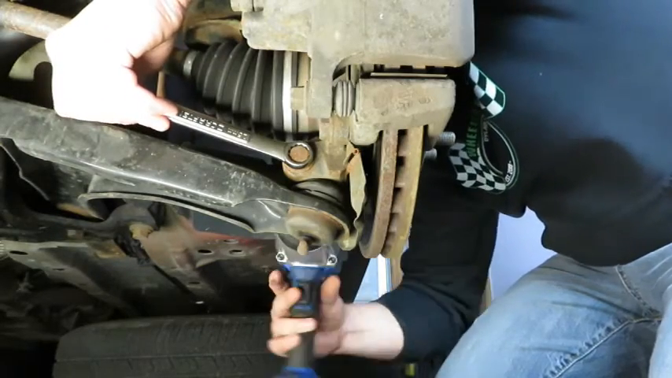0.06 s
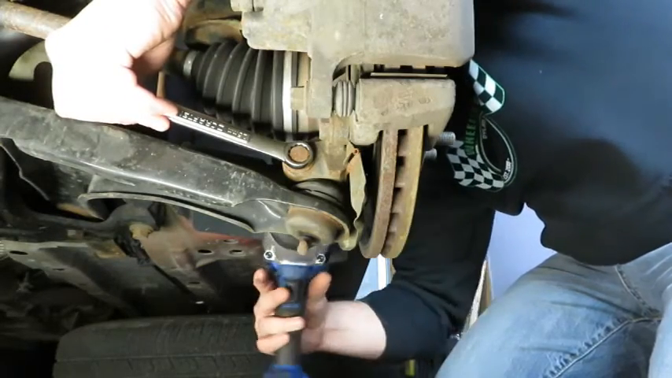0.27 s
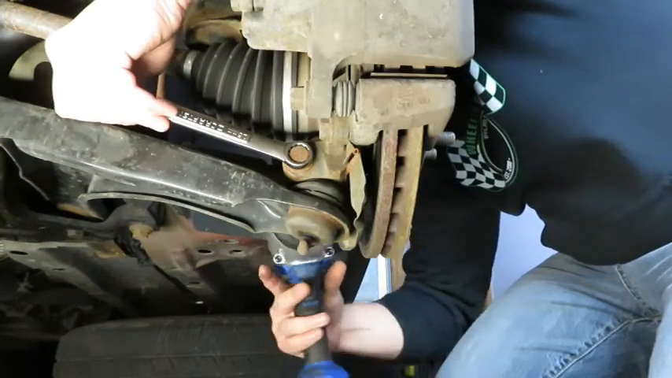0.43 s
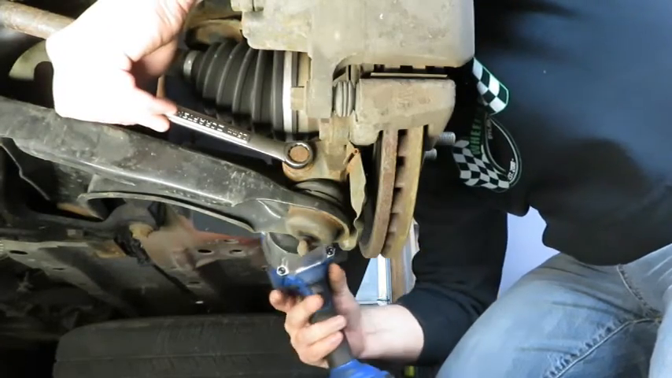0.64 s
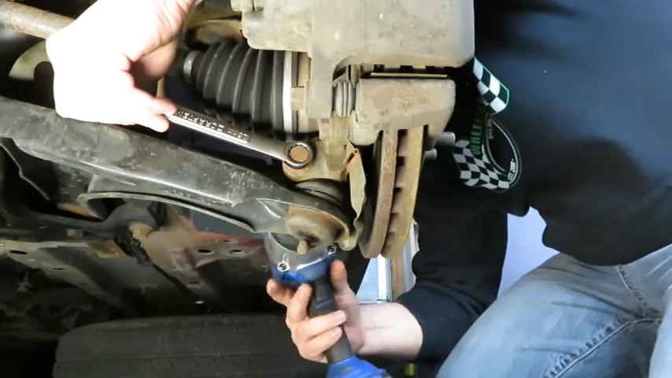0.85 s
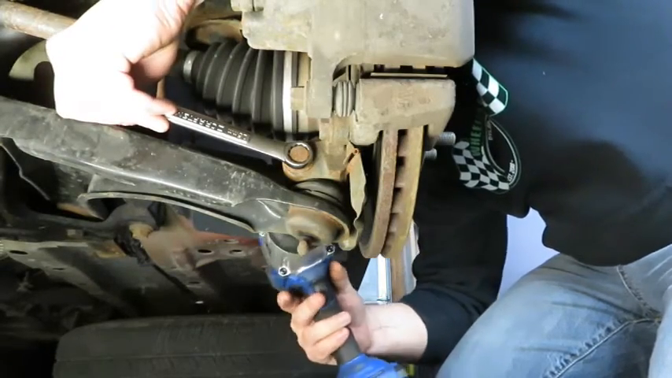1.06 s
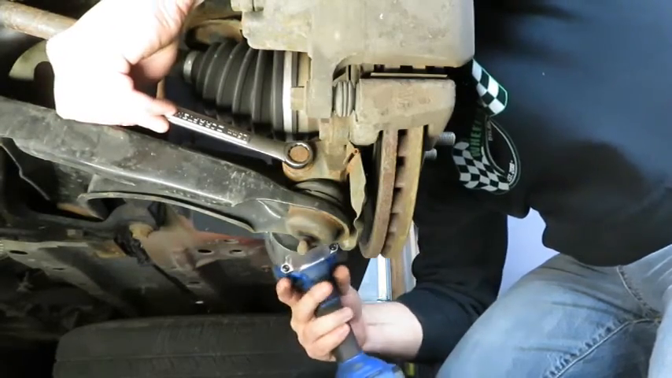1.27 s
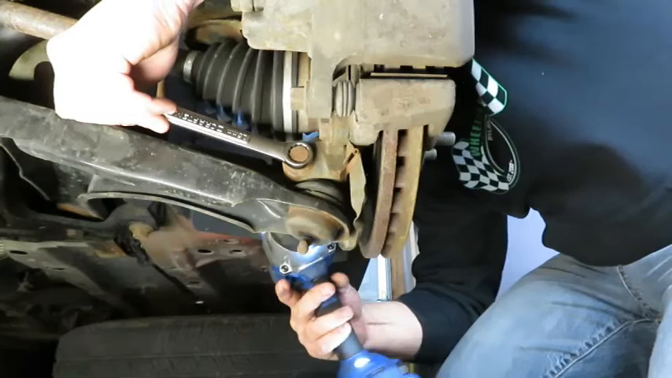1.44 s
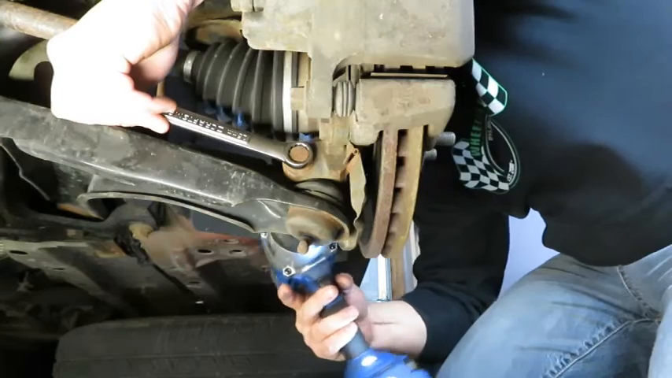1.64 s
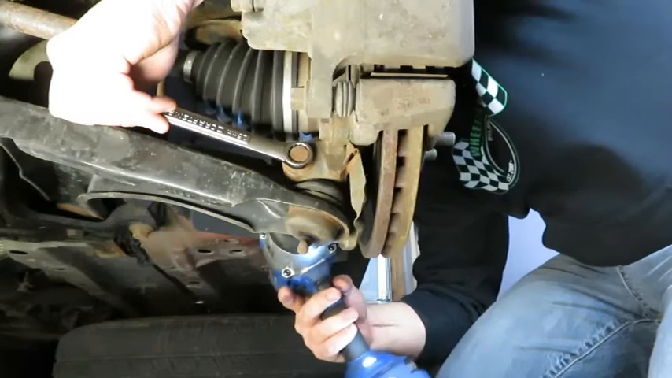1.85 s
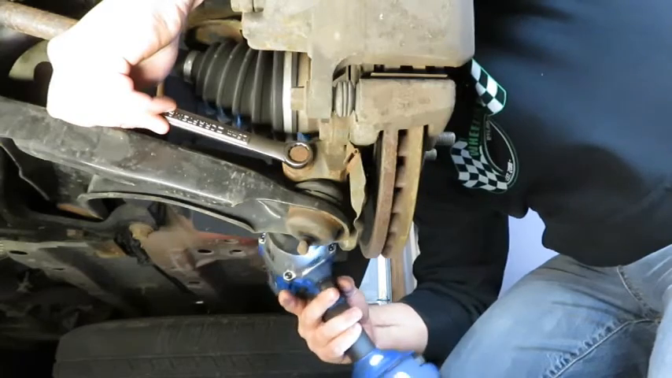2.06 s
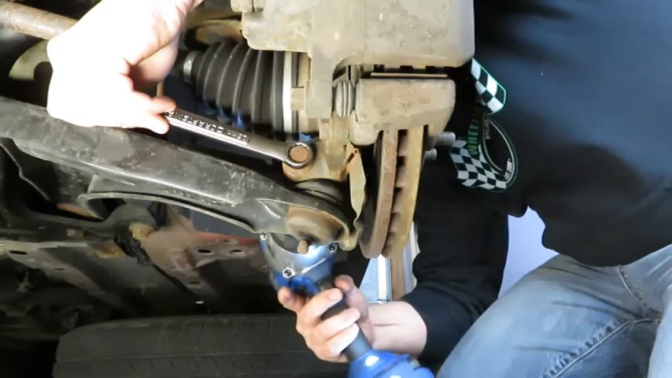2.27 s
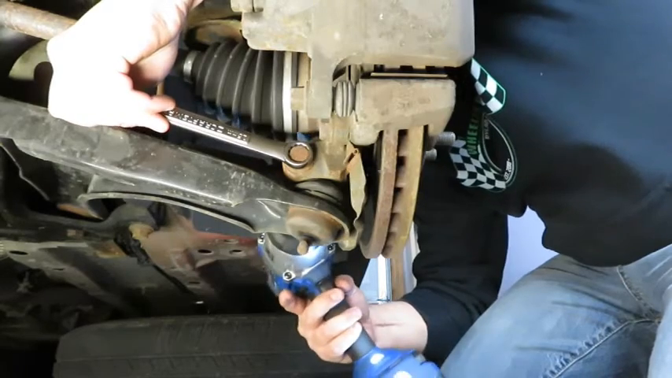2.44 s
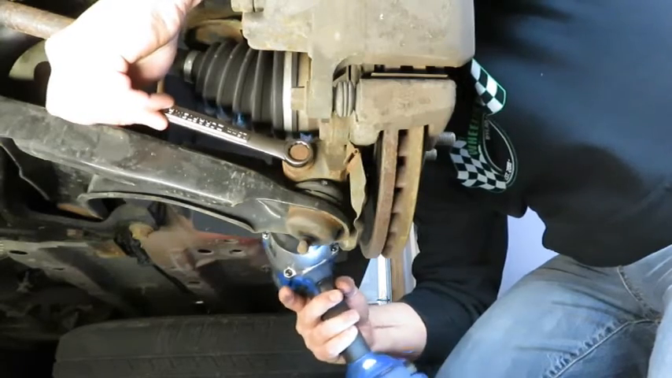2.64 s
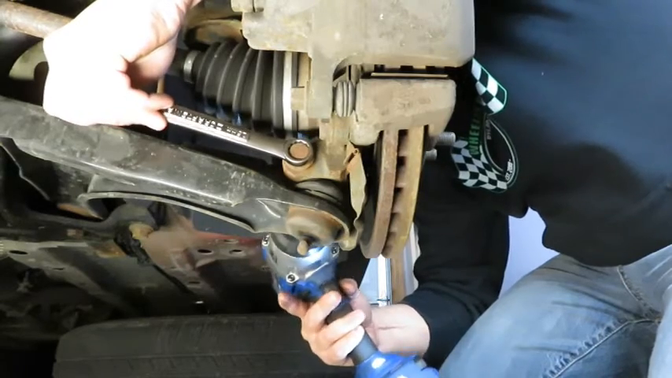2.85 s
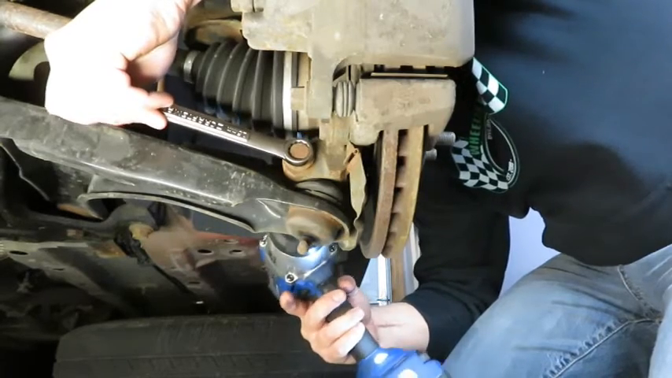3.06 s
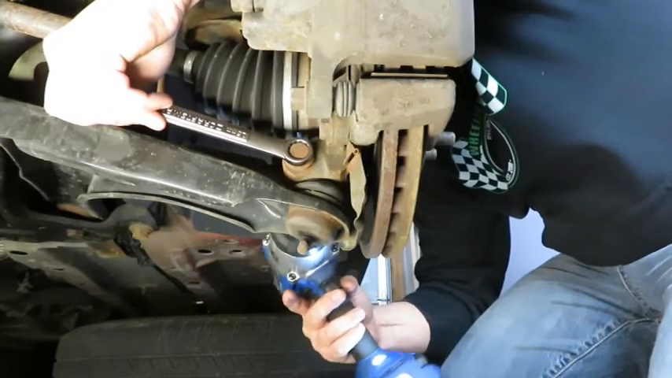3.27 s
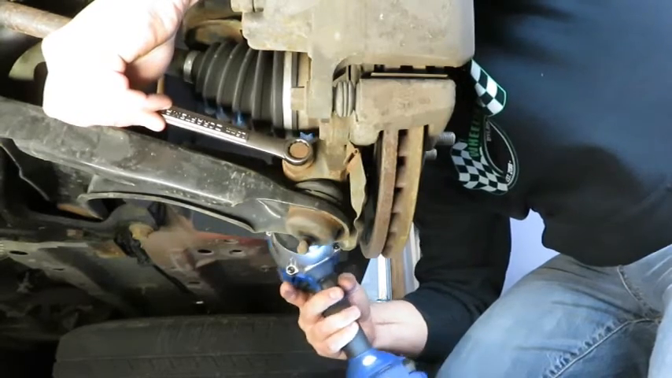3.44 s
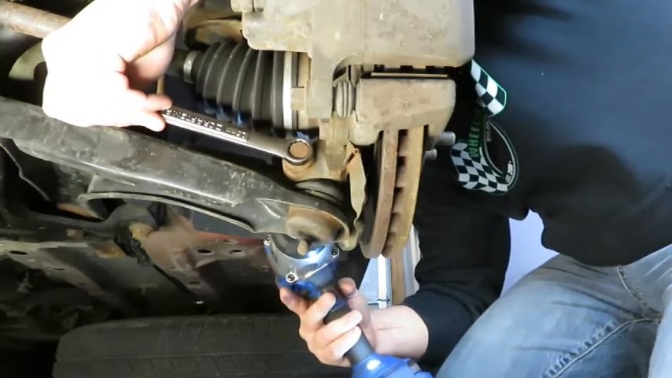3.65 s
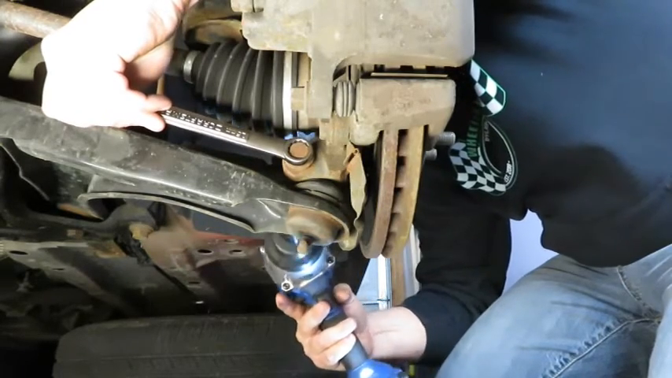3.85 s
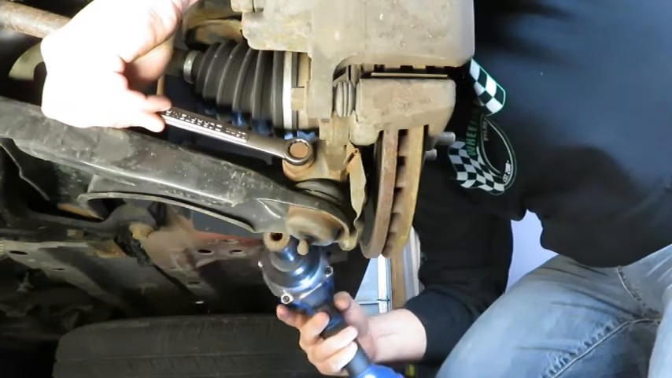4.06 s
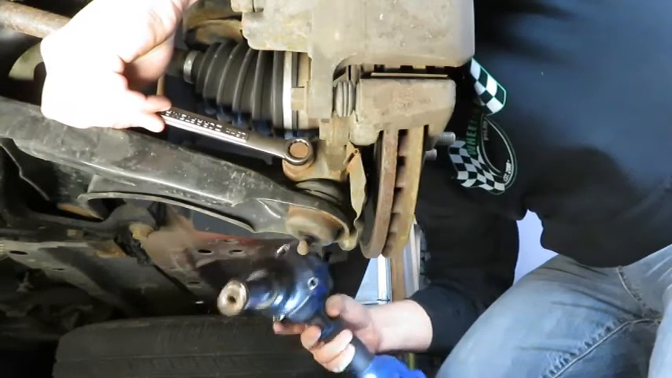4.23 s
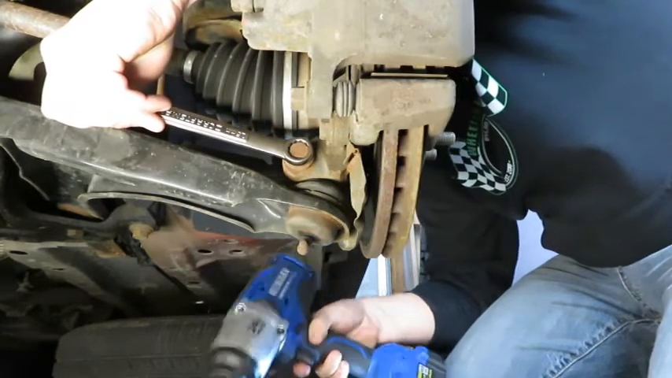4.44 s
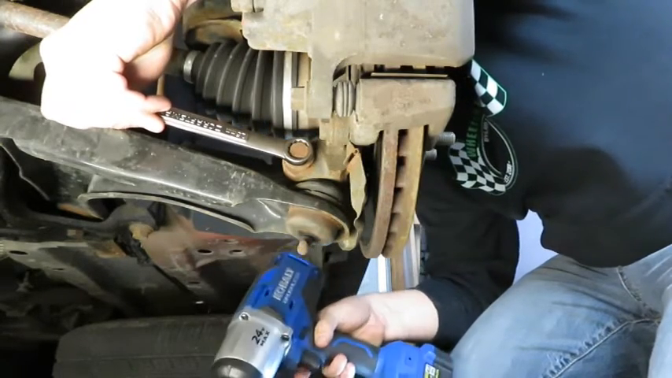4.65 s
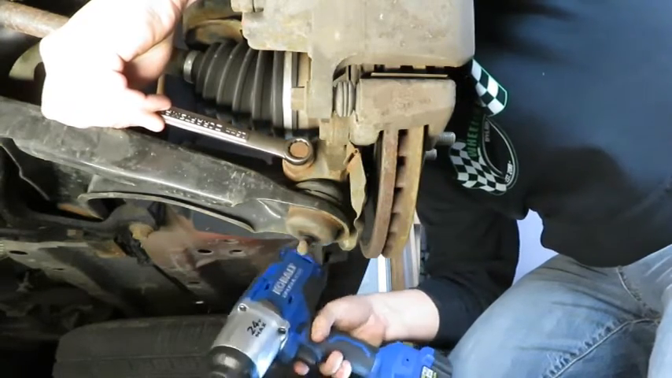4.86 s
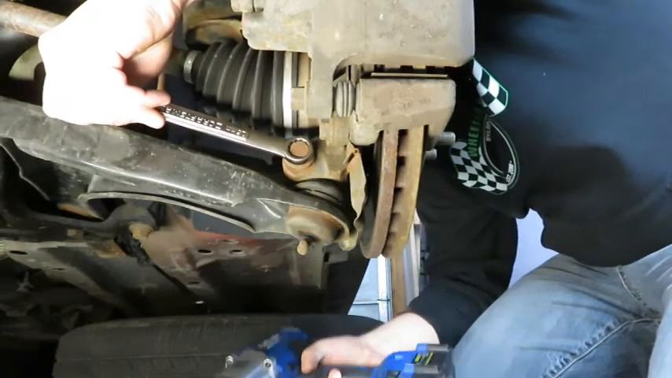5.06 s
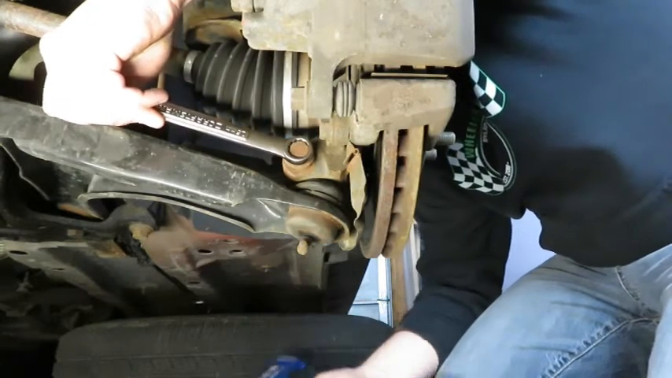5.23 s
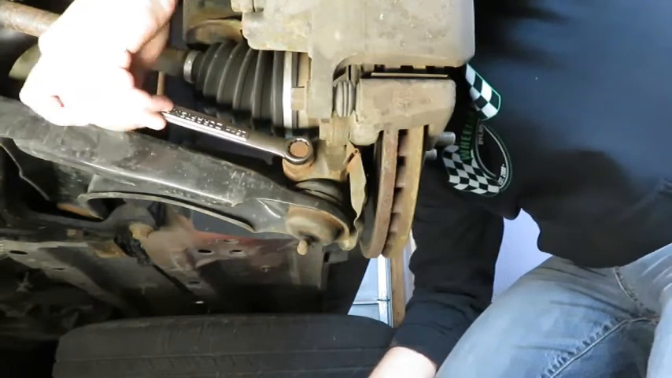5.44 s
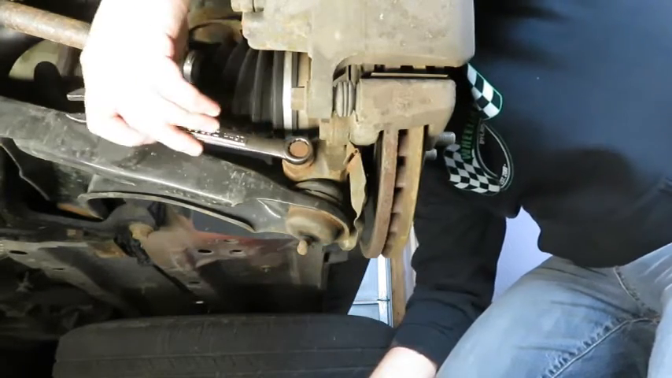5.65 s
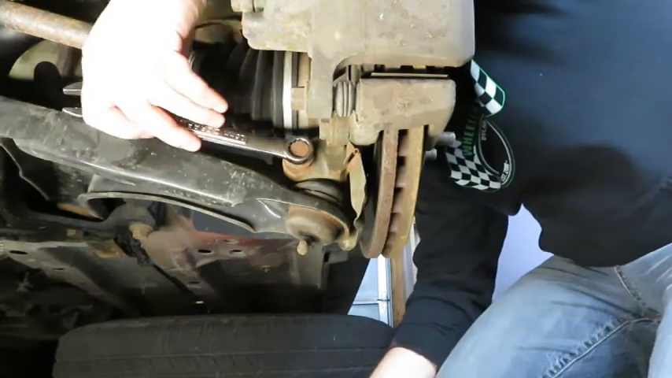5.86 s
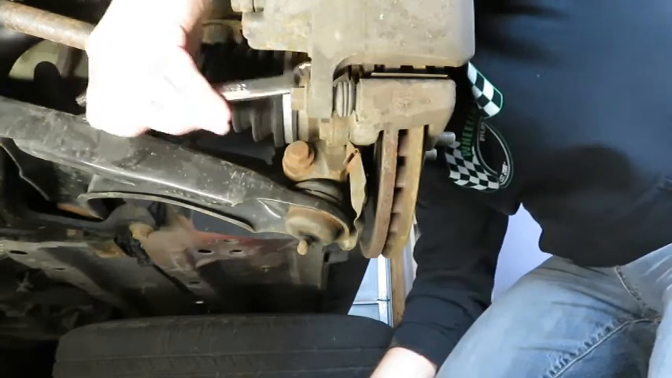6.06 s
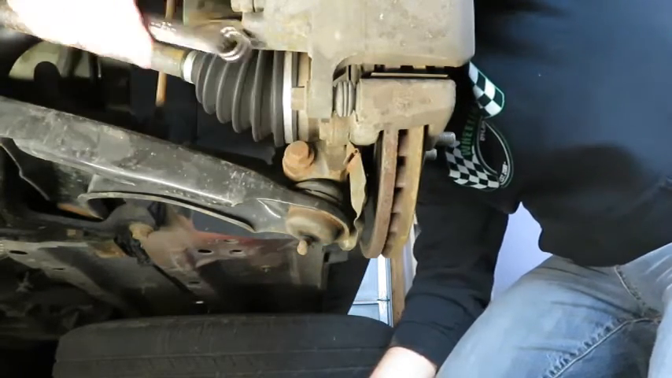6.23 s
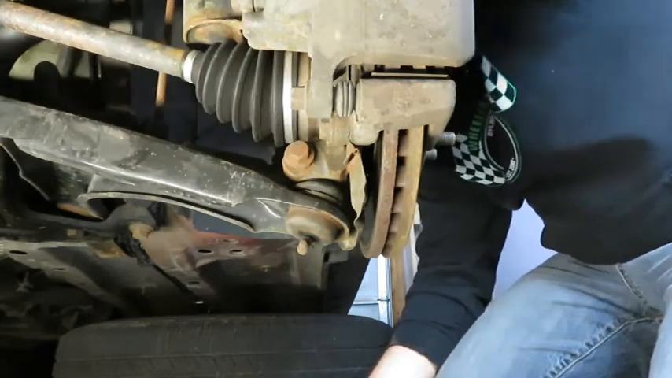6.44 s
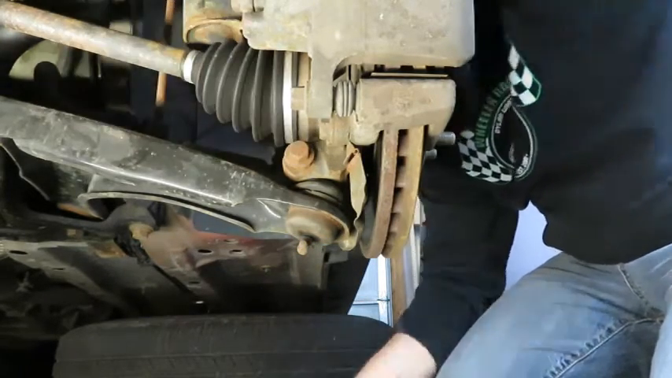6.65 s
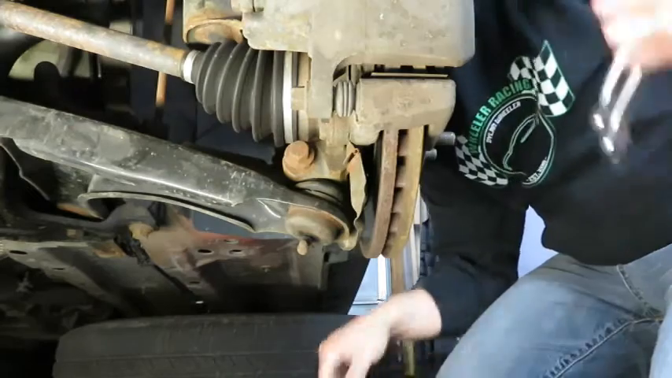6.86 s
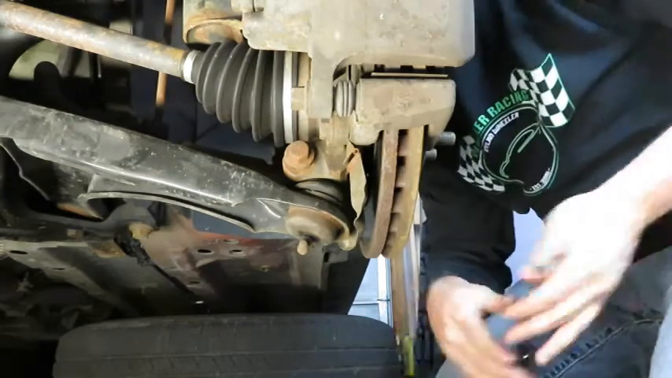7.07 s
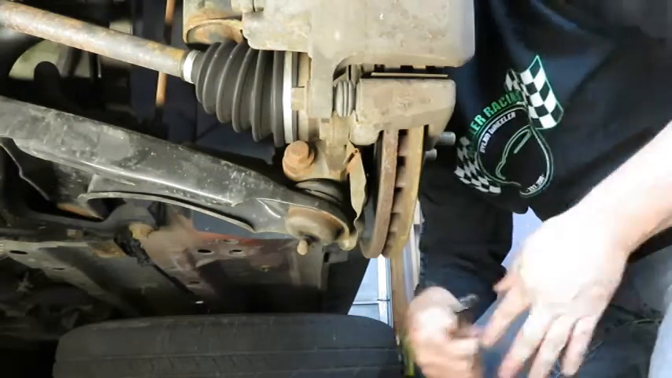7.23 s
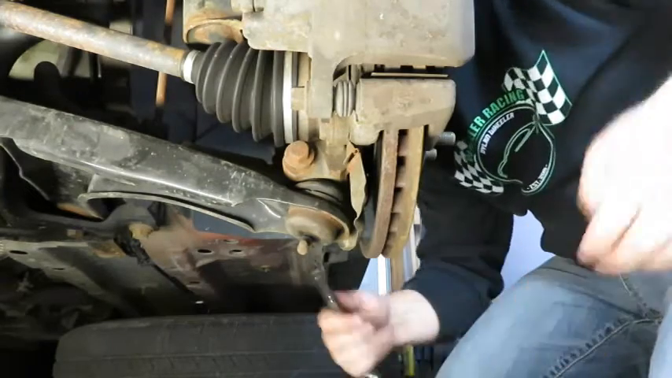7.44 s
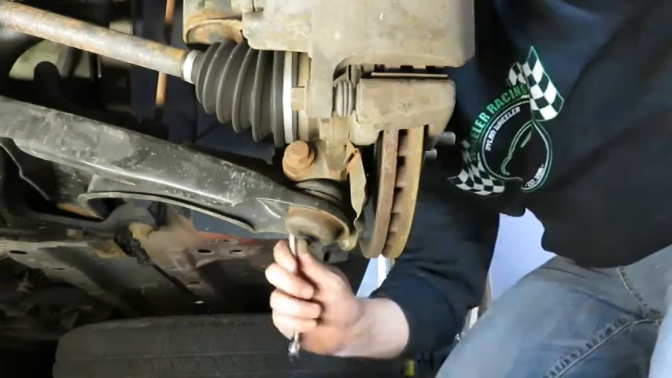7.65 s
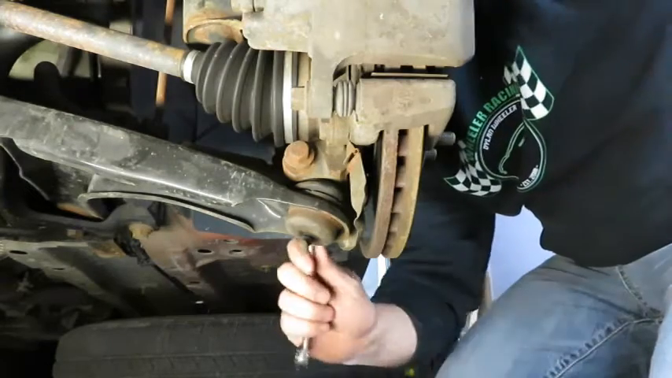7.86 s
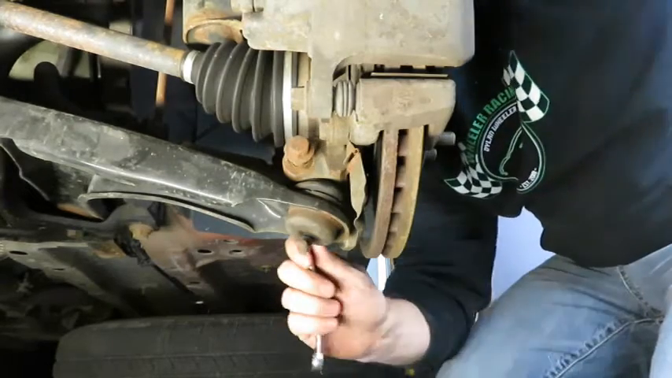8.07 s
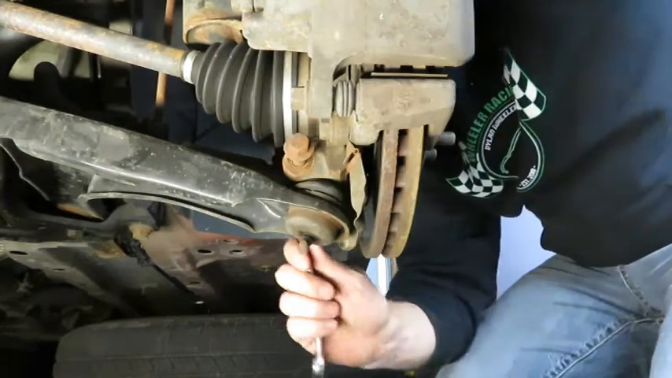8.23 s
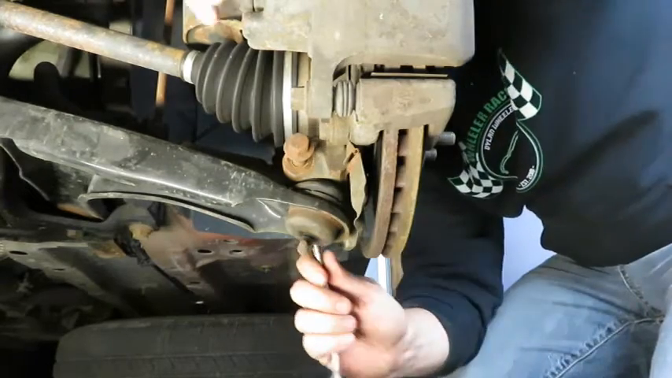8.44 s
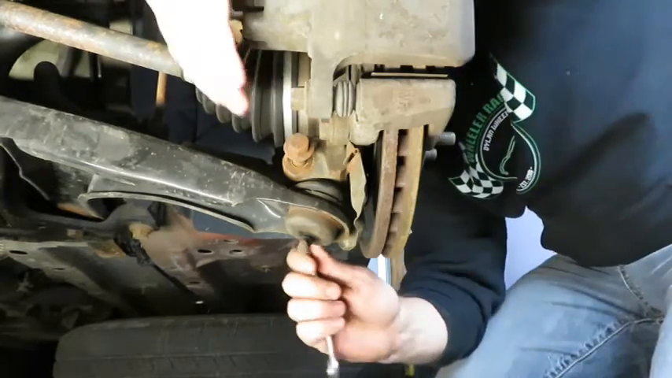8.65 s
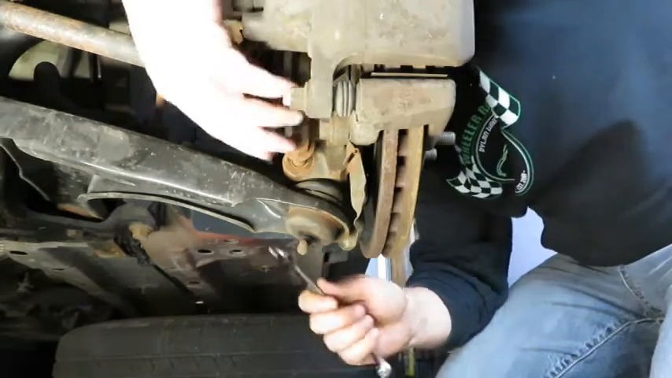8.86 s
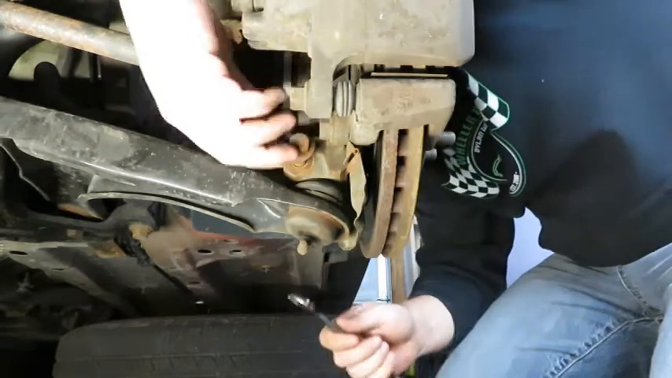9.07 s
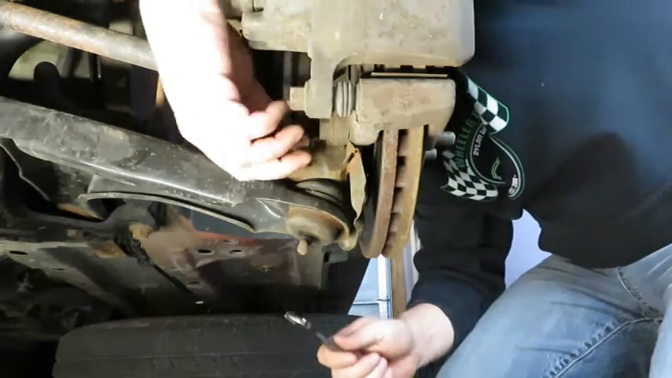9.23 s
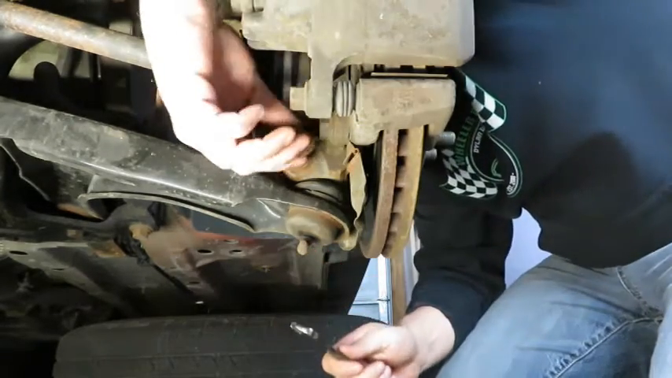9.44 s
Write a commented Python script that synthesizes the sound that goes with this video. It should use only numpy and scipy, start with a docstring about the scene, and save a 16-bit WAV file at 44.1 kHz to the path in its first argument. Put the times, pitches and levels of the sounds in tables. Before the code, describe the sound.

A close, nearly centred microphone in a garage with low rumble and a short reverberation. At 0.1 s a socket scrapes and thuds onto a nut, the suspension arm ringing dully; softer knocks follow by 0.6 s and a small clack at 1.3. At 1.43 an impact wrench surges into violent metallic hammering, about thirty blows per second, overloading at first. Further bursts start near 1.85, 2.3, 2.8 and 3.15 s, generally weaker, with gear rattle between. At 3.44 the nut is free: the motor spins up quickly, then its whine glides down, stopping around 4.8. Light handling knocks lead to a solid set-down at 5.5. A spanner comes off with a bright ringing clink at 6.05 and a smaller one at 6.2. Faint cloth brushes past near 6.7. Steel clacks at 7.95, loudly at 8.1, then 8.3 and sharply at 8.45. Quiet rumble follows, with small clacks near 9.4.

```python
"""Impact wrench in a garage

A cordless impact wrench hammers a suspension nut in short bursts, close by, then spins free and coasts down.
Random contact noise and decaying sine tones make the metal; gear tones and tooth noise make the motor.
Tools are handled and set down, a spanner comes off with a clink, and steel hardware clacks against the hub.
A low room rumble lies under it all; the hardest blows overload the microphone."""
import sys
import numpy as np
from scipy import signal
from scipy.fft import rfft, irfft
from scipy.io import wavfile
from scipy.ndimage import uniform_filter1d

SR = 44100
rng = np.random.default_rng(int(sys.argv[2]) if len(sys.argv) > 2 else 0)


def generate_wav(signal):
    """Clip the signal to [-1, 1] and save it as 16-bit WAV at the path in sys.argv[1]."""
    frames = np.transpose(np.atleast_2d(signal))
    scaled = np.clip(frames, -1, 1) * 32767
    pcm = np.round(scaled).astype(np.int16)
    wavfile.write(sys.argv[1], SR, pcm)


N = 418950
TIME = np.arange(N) / SR


def amp(db):
    """Turns decibels into a gain."""
    return 10 ** (np.asarray(db) / 20)


def unit(x):
    """Scales a signal to an average strength (rms) of 1."""
    return x / np.sqrt(np.mean(x ** 2) + 1e-20)


def read(points, hz):
    """Reads a table by frequency, on a logarithmic axis as the ear hears pitch."""
    f, value = np.transpose(points)
    return np.interp(np.log(hz + 1), np.log(f + 1), value)


def bump(hz, centre_hz, octaves):
    """Draws a bell curve around one frequency, on a logarithmic axis."""
    distance = np.log2((hz + 1) / (centre_hz + 1))
    return np.exp(-(distance / octaves) ** 2)


def swell(rows):
    """Makes a gain over time from rows that start with s and end with dB; silent outside them."""
    rows = np.array(rows)
    s, db = rows[:, 0], rows[:, -1]
    inside = np.interp(TIME, s, np.ones(len(rows)), 0, 0)
    return inside * amp(np.interp(TIME, s, db))


def add(mix, s, sound):
    """Lays a sound into the mix at time s."""
    part = mix[:, round(s * SR):][:, :sound.shape[1]]
    part += sound[:, :part.shape[1]]


def colour(x, spectrum, tilt=0):
    """Gives x a spectrum, tilted in dB per octave above 200 Hz, at rms 1."""
    hz = np.fft.rfftfreq(x.shape[1], 1 / SR)
    db = read(spectrum, hz) + tilt * np.log2(np.maximum(hz, 200))
    return unit(irfft(rfft(x) * amp(db), x.shape[1]))


def noise(spectrum, tilt=0, size=N):
    """Makes two unrelated coloured noises: mid (centre) and side (left minus right)."""
    return colour(rng.standard_normal((2, size)), spectrum, tilt)


def drift(per_s):
    """Wanders at random with rms 1, through per_s new values each second."""
    knots = rng.standard_normal(2000)
    return unit(np.interp(TIME * per_s, np.arange(len(knots)), knots))


def widen(pair, width):
    """Sets how strong the side is at each frequency."""
    gain = amp(read(width, np.fft.rfftfreq(N, 1 / SR)))
    return np.array([pair[0], irfft(rfft(pair[1]) * gain, N)])


def strike(crack, tilt, t60, hold, modes=(), favoured_hz=0, muted_hz=0, ring_db=0, favour_db=7,
           mute_octaves=.1, spread=0.19):
    """Rough contact makes a crack coloured by the body's own tones (modes), which ring on and beat."""
    t, hz = np.arange(SR // 2) / SR, np.fft.rfftfreq(SR // 2, 1 / SR)
    # full strength for hold seconds, then 60 dB weaker after each t60
    chatter = noise(crack, tilt, size=len(t)) * amp(-60 * np.maximum(t - hold, 0) / t60)
    width_hz, resonance = 60, 0.66  # how broadly and how strongly the modes colour the crack
    beat_depth, mute_db = .45, 15
    body, ring = np.ones(len(hz), complex), 0 * t
    for mode_hz, db, ring_t60 in modes:
        # a mode struck near its still point stays quiet
        db = db - mute_db * bump(mode_hz, muted_hz, mute_octaves)
        body += resonance * amp(db / 2) / (1 + 2j * (hz - mode_hz) / width_hz)
        phase, luck = rng.random((2, 2, 1))
        height = (0.83 + luck / 2) * amp(ring_db + db + tilt * np.log2(mode_hz / 3000))
        # close pairs of modes beat
        beat = 1 + beat_depth * np.cos(2 * np.pi * rng.uniform(5.7, 33) * t)
        tone = np.sin(2 * np.pi * (mode_hz * t + phase))
        ring = ring + height * beat * amp(-60 * t / ring_t60) * tone
    # an extra early ring dies fast, damped while the parts still touch
    prompt_db, prompt_s = 1, 0.0065
    ring = ring * (1 + amp(prompt_db) * np.exp(-t / prompt_s))
    # the place of contact brings out one region of tones
    favour = amp(favour_db * bump(hz, favoured_hz, spread))
    sound = irfft((rfft(chatter) * body + rfft(ring)) * favour, len(t))
    soft_start = np.sin(np.pi / 2 * np.minimum(t / 0.0014, 1)) ** 2
    damped_end = np.minimum(2 - 2 * t / t[-1], 1) ** 2
    sound *= soft_start * damped_end
    return sound * np.linalg.norm(chatter) / np.linalg.norm(sound)


def hits(rows, crack, hold, modes=(), **contact):
    """Plays a table of blows on one body."""
    out = np.zeros((2, N))
    for s, db, tilt, t60, *place in rows:
        add(out, s, amp(db) * strike(crack, tilt, t60, hold, modes, *place, **contact))
    return out


# two stretches when the background sinks and swells back:
# (time [s], depth [dB], time from start to recovery [s], recovery [dB per s])
DIPS = [(1.445, 20.5, 3.03, 13), (8.065, 14.5, 0.65, 7)]


def dips():
    """Makes the background's gain: it sinks quickly, stays low, and climbs back at a steady rate."""
    sink_s = 0.096
    db = np.zeros(N)
    for s, depth_db, hold, db_per_s in DIPS:
        corners = [s, s + sink_s, s + hold, s + hold + depth_db / db_per_s]
        db -= np.interp(TIME, corners, [0, depth_db, depth_db, 0])
    return amp(db)


# colour of the room rumble, shared by the shudder: (frequency [Hz], level [dB])
RUMBLE = [(12, -37), (20, -17), (65, -1.5), (113, -5), (210, -13.5), (241, -15.5), (277, -19.5), (310, -19),
          (499, -27), (780, -29), (1610, -34), (3440, -37.5), (6010, -43.5), (13900, -55.5), (16000, -73.5)]
# steady low hum: (time [s], level [dB])
HUM = [(0, -43.5), (1.4, -47), (6.6, -48.5), (7.6, -37), (8.06, -38.5), (9.5, -52.5)]


def room_air(rumble_db=-40, hum_hz=117.3, octave_db=-11):
    """Filtered noise makes rumble and hiss; two sines an octave apart make a steady low hum."""
    low = np.sin(2 * np.pi * hum_hz * TIME)
    high = np.sin(2 * np.pi * 2 * hum_hz * TIME)
    air = amp(rumble_db) * noise(RUMBLE)
    air[0] += swell(HUM) * (low + amp(octave_db) * high)
    return dips() * air


# low shudder while the socket is worked onto the nut: (time [s], level [dB])
SHUDDER = [(0, -45), (.15, -35), (.32, -36.5), (.42, -54), (.68, -35.5), (.9, -60)]


def shudder():
    """Worked onto the nut, the socket stirs a low noise that swells and fades."""
    return swell(SHUDDER) * noise(RUMBLE, tilt=-6.5)


# the socket sliding on: (time [s], level [dB])
SCRAPE = [(.03, -61), (.085, -39), (.118, -34.5), (.13, -51)]
# colour of a dull crack, shared by the arm and the handled tools: (frequency [Hz], level [dB])
KNOCK_CRACK = [(47, -33.5), (80, -11), (339, -6.5), (471, -2.5), (731, -5), (1060, -5.5), (1570, -7),
               (2040, -10.5), (3860, -20), (5980, -26.5), (15000, -61.5)]
# tones of the suspension arm: (frequency [Hz], level [dB], time to fall 60 dB [s])
ARM_MODES = [(136, -5, 0.6), (243, 1, 0.33), (732, -3, 0.23), (894, -6.5, 0.22), (1244, -4, 0.19),
             (1452, -3.5, 0.082), (1664, -2.5, 0.22), (1960, -6, .27)]
# the socket pushed home on the nut: (time [s], level [dB], tilt [dB per octave],
# time for the crack to fall 60 dB [s], favoured frequency [Hz])
SHOVES = [(.119, -19, 5, 0.12, 5050), (.127, -15.5, .5, .11, 740), (.145, -22, -5.5, 0.29, 405),
          (.19, -29.5, -16, 0.29, 245.3), (.607, -37, -3, 0.092, 740), (.635, -33.5, -5, 0.21, 470.5)]


def suspension_arm():
    """The socket scrapes on as noise; each shove makes the suspension arm crack and ring."""
    shoves = hits(SHOVES, KNOCK_CRACK, hold=0.003, modes=ARM_MODES, ring_db=-16.5)
    return shoves + swell(SCRAPE) * noise(KNOCK_CRACK)


# tools being handled and set down, and dull low thuds under the spanner's clinks and the hub's clacks: (time
# [s], level [dB], tilt [dB per octave], time for the crack to fall 60 dB [s])
KNOCKS = [(.335, -47, 2, 0.17), (.386, -46.5, 4.5, 0.069), (1.345, -43.5, 6.5, 0.039),
          (3.328, -40, 7.5, 0.065), (4.57, -41, 3.5, 0.051), (4.924, -41.5, 2.5, 0.1),
          (5.299, -43.5, -0.5, 0.35), (5.334, -34.5, 6, 0.047), (5.473, -20, -0.5, 0.11),
          (5.557, -33.5, 1.5, 0.081), (6.056, -30.5, -7, 0.29), (6.228, -40, -5.5, 0.37),
          (6.457, -38.5, 2.5, 0.041), (6.63, -40, 2.5, 0.15), (6.665, -39.5, 0.5, 0.048),
          (6.82, -47.5, 2.5, 0.093), (8.097, -24.5, 0.5, 0.13), (8.457, -37, -3.5, 0.22),
          (9.377, -40.5, -0.5, 0.14)]


def dull_knocks():
    """Dull knocks: short bursts of contact noise with no ringing tones."""
    return hits(KNOCKS, KNOCK_CRACK, hold=0.0021)


# colour of the hub's first crack: (frequency [Hz], level [dB])
HUB_CRACK = [(88, -53), (150, -32.5), (759, -14.5), (888, -17.5), (1040, -21.5), (1140, -7), (1340, -12),
             (1630, -2), (2360, 0), (4670, -2), (7920, -7), (12200, -21), (13200, -11), (16000, -59.5)]
# tones of the hub: (frequency [Hz], level [dB], time to fall 60 dB [s])
HUB_MODES = [(1157, -8, .4), (1337, 0, .28), (1570, -10, .17), (1690, -5, .25), (2220, 0, .22),
             (2821, -2, .15), (3397, -9, .23), (3644, -5, .24), (4420, -9, .2), (5060, -8, .22),
             (5545, -12, .3), (5785, -9, .24), (6438, -7, .15), (9060, -12, .2), (12910, -11, .22)]
# steel hardware against the hub and the tool: (time [s], level [dB], tilt [dB per octave],
# time for the crack to fall 60 dB [s], favoured frequency [Hz], muted frequency [Hz],
# ring level [dB], favour [dB])
CLACKS = [(1.262, -28.5, -10.5, 0.11, 1900, 1010, -36.5, 3), (7.940, -24, -8.5, 0.12, 1410, 2900, -20, -2),
          (8.096, -6, 2.5, .048, 1640, 1140, -34, 16.5), (8.289, -19.5, -2.5, 0.17, 5200, 2700, -27, 7),
          (8.303, -17.5, -2.5, 0.066, 3600, 2800, -12, 8), (8.312, -22, -8.5, 0.08, 2200, 2800, -21, 13.5),
          (8.454, -8.5, 3.5, 0.034, 5600, 2400, -25, 5), (8.458, -10, 0.5, 0.036, 3530, 1890, -31, 7),
          (9.041, -49, -9, .17, 1950, 1250, -23, 7), (9.400, -29.5, -9, 0.16, 1670, 1200, -17.5, 11),
          (9.450, -31.5, -10.5, .091, 1580, 1130, -24, 8.5)]


def hub_clacks():
    """Steel parts knock together: a crack, then the hub's tones ring on."""
    return hits(CLACKS, HUB_CRACK, hold=0.0025, modes=HUB_MODES, spread=.15, mute_octaves=.15)


FREE_S, STOP_S = 3.44, 4.82  # the free run starts; the shaft stops


def free_speed():
    """Turns per second with the nut free: an even spin-up, then a coast against dry friction and air drag."""
    start_turns_per_s, spin_up_turns_per_s2 = 140, 1250
    friction_turns_per_s2 = 165
    equal_turns_per_s = 224  # speed at which air drag equals the dry friction
    spin_up = start_turns_per_s + spin_up_turns_per_s2 * (TIME - FREE_S)
    # constant friction plus drag that grows with speed squared gives a tangent
    time_left = STOP_S - np.clip(TIME, FREE_S, STOP_S)
    coast = equal_turns_per_s * np.tan(time_left * friction_turns_per_s2 / equal_turns_per_s)
    return uniform_filter1d(np.clip(spin_up, 0, coast), size=1500)


def free_gain(speed, rest_db, top_db):
    """In the free run loudness follows speed, with an extra fade near the end."""
    attack_s, fade_s, fade_db_per_s = 0.034, 4.65, 47
    attack = np.clip((TIME - FREE_S) / attack_s, 0, 1)
    db = rest_db + (top_db - rest_db) * speed / speed.max()
    return attack * amp(db - fade_db_per_s * np.maximum(TIME - fade_s, 0))


# gear and bearing tones: (multiple of the shaft speed, level near rest [dB], level at top speed [dB])
GEAR_ORDERS = [(4, -18, -14), (9, -4, -15), (10.4, -25, -15), (12, -17, 2.5), (15, -15, -7),
               (16.4, -16, -12), (21, -19, -17), (24, -20, -19), (29, -19, -19), (36, -20, -20)]
# how strongly the tool housing passes each tone: (frequency [Hz], level [dB])
HOUSING = [(100, -26), (450, -16), (1100, -12), (1500, -16), (2000, -10), (2300, -9), (2550, -2), (2800, 1),
           (3000, -1), (3250, -11), (3500, -8), (3800, -16), (9000, -28)]


def whine(hz, gain):
    """Gear tones, each fluttering on its own, sweep through the housing's resonance."""
    flutter_db, flutter_per_s = 4, 45
    slip_turns, slips_per_s = .1, 150
    on, out = (gain > 0) & (TIME < STOP_S), np.zeros((2, N))
    turns, pace = np.cumsum(hz)[on] / SR, hz[on] / hz.max()
    for k, rest_db, top_db in GEAR_ORDERS:
        db = rest_db + (top_db - rest_db) * pace + read(HOUSING, k * hz[on])
        db = db + flutter_db * drift(flutter_per_s)[on]
        slip = slip_turns * drift(slips_per_s)[on]
        out[:, on] += amp(db) * np.sin(2 * np.pi * (k * turns + slip + rng.random((2, 1))))
    return gain * out


# trigger pulls: (motor start time [s], first blow time [s], let-go time [s],
# gear rattle level [dB], release [dB per s])
PULLS = [(1.432, 1.447, 1.6, -20.5, 78), (1.832, 1.862, 2, -22.5, 75), (2.286, 2.332, 3, -28.5, 33),
         (2.774, 2.829, 2.84, -32.5, 148), (3.128, 3.165, 3.35, -33.5, 108)]


def loaded_rattle():
    """Makes the rattle's gain under load: a swell to the first blow, an easing hold, then a release."""
    swell_db, ease_db_per_s = 15.5, 34.5
    gain = np.zeros(N)
    for start, first_blow, let_go, db, release_db_per_s in PULLS:
        rise = np.interp(TIME, [start, first_blow], [-swell_db, 0])
        ease = ease_db_per_s * (np.clip(TIME, first_blow, let_go) - first_blow)
        release = release_db_per_s * np.maximum(TIME - let_go, 0)
        # each new pull takes over from the one before
        gain = np.where(TIME > start, amp(db + rise - ease - release), gain)
    return gain


# resonances of the tool's case: (frequency [Hz], width [Hz], boost [dB])
CASE_RESONANCES = [(1600, 94, 8.9), (2330, 230, 5.5), (2780, 120, 2.5), (3570, 240, 3.6)]
# overall colour of the rattle: (frequency [Hz], level [dB])
GEAR_COLOUR = [(100, -18), (250, -15.5), (450, -11), (700, -8), (1000, -8), (1600, -7), (1950, -2.5),
               (2400, -5), (3400, -6), (4500, -10), (7000, -16.5), (9500, -26.5), (15000, -36)]


def rattle(hz):
    """Gear teeth chatter much the same on each turn and ring the case; they dull at low shaft speeds."""
    repeat = .45  # share of the last turn heard again
    lurch_db, lurches_per_s = 1.6, 55
    treble_hz, full_turns_per_s = 4460, 137  # the treble weakens below this shaft speed
    grain_db = 2.0 * unit(uniform_filter1d(rng.standard_normal(N), size=90))
    grains = amp(grain_db + lurch_db * drift(lurches_per_s))
    teeth = rng.standard_normal((2, N)) * grains
    turn_ago = TIME - 1 / np.maximum(hz, 20)
    teeth = teeth + repeat * np.array([np.interp(turn_ago, TIME, channel) for channel in teeth])
    bins = np.fft.rfftfreq(N, 1 / SR)
    case_db = sum(db / (1 + (2 * (bins - centre) / width) ** 2) for centre, width, db in CASE_RESONANCES)
    bright = colour(irfft(rfft(teeth) * amp(case_db), N), GEAR_COLOUR)
    dull = signal.sosfiltfilt(signal.butter(2, treble_hz, fs=SR, output="sos"), bright)
    return dull + np.minimum(hz / full_turns_per_s, 1) * (bright - dull)


# the motor's first surge, sagging against the tight nut:
# (time [s], shaft speed before a slight waver [turns per s], whine level [dB])
SURGE = [(1.428, 240, -45), (1.44, 245, -22), (1.495, 220, -20.5), (1.6, 185, -55)]


def motor():
    """Shaft speed drives whine and rattle, first under load, then running free."""
    waver, wavers_per_s = .002, 50
    whine_db = -36
    rattle_rest_db, rattle_top_db = -48, -43
    s, surge, _ = np.transpose(SURGE)
    free = free_speed()
    hz = np.where(TIME < FREE_S, np.interp(TIME, s, surge), free)
    hz = hz * (1 + waver * drift(wavers_per_s))
    # the free whine vanishes below 10 turns per second
    whine_gain = swell(SURGE) + free_gain(free, whine_db, whine_db) * np.clip(free / 10, 0, 1)
    rattle_gain = loaded_rattle() + free_gain(free, rattle_rest_db, rattle_top_db)
    return whine(hz, whine_gain) + rattle_gain * rattle(hz)


# colour of the socket's first crack: (frequency [Hz], level [dB])
SOCKET_CRACK = [(25, -17), (60, -10.5), (130, -6.5), (260, -5), (400, 0), (700, -2), (1300, 1.5),
                (1600, -1.5), (2100, 0.5), (3000, 0.5), (4600, -1.5), (6400, -7), (12500, -16.5),
                (16000, -21)]
# tones of the struck socket: (frequency [Hz], level [dB], time to fall 60 dB [s])
SOCKET_MODES = [(857, -11, .2), (1150, -12, .2), (1333, -10, .3), (1580, -1, .22), (1686, -2, .25),
                (1824, -4, .2), (1928, 0, .25), (2270, -1, .3), (2410, -2, .25), (2918, -6, .2),
                (3033, -1, .2), (4339, -3, .2), (4605, -2, .15), (4980, -6, .12), (5110, -7, .12)]
# hammer blows, and a faint gear clunk before the last burst:
# (time [s], level relative to the hammer's overall level [dB],
# favoured frequency [Hz], tilt [dB per octave])
BLOWS = [(1.457, -0.5, 2700, -2), (1.499, 0, 2240, -2.5), (1.529, 5, 4500, 1.5), (1.532, 4.5, 2880, 1.5),
         (1.574, -1.5, 1610, 1), (1.613, -3.5, 1630, 0), (1.685, -9, 2100, 0.5), (1.71, -12.5, 1520, -1.5),
         (1.831, -21, 2230, -2), (1.861, -2.5, 1860, 0.5), (1.907, -4.5, 1950, 1), (1.943, -9, 1680, 0.5),
         (1.973, -6.5, 1900, 1), (2.001, -6, 4700, 1.5), (2.027, -9, 1530, 3), (2.052, -9, 4170, 1),
         (2.075, -10.5, 1650, 1), (2.105, -10.5, 1730, 1), (2.164, -10.5, 1670, -1),
         (2.273, -20.5, 1580, -1), (2.327, -11.5, 3140, 0), (2.366, -10.5, 1590, 2.5),
         (2.399, -7.5, 4640, -1), (2.427, -10, 1540, 2.5), (2.455, -8.5, 4800, 1), (2.481, -10.5, 1620, 2),
         (2.506, -10.5, 1580, 1), (2.532, -11, 1560, 0), (2.556, -12.5, 1910, 2.5),
         (2.583, -13.5, 1600, 1.5), (2.615, -13, 1550, 1.5), (2.649, -13.5, 2160, 2.5),
         (2.822, -17, 2090, 2), (2.832, -13, 1550, 1), (2.871, -14, 3800, 0), (2.889, -17, 1610, -0.5),
         (3.078, -28.5, 1840, -0.5), (3.125, -22, 1980, -0.5), (3.159, -11, 1580, 1),
         (3.191, -15, 2000, -1), (3.203, -8, 3220, 0.5), (3.24, -9.5, 1550, 1)]


def hammer(t60=0.084, level_db=-8.5):
    """The hammer slams the anvil and the socket rings; the cracks of harder blows die away faster."""
    hard_db, shorten_per_db = -6, .06  # above this table level the crack dies faster, by this share per dB
    out = np.zeros((2, N))
    for s, db, favoured_hz, tilt in BLOWS:
        short_t60 = t60 / (1 + shorten_per_db * max(db - hard_db, 0))
        blow = strike(SOCKET_CRACK, tilt, short_t60, 0.0037, SOCKET_MODES, favoured_hz,
                      ring_db=-20, favour_db=7.5)
        add(out, s, amp(db + level_db) * blow)
    return out


# low thumps under some blows: (time [s], level before an uneven cut per channel [dB])
THUMPS = [(1.9759, -1), (2.004, -9.5), (2.029, -5), (2.052, -6.5), (2.077, -10.5), (2.365, -17.5),
          (2.4, -17), (2.429, -3)]


def thumps():
    """A low push and a slower rebound jolt each microphone port a little differently."""
    length, rebound = 0.0006, 0.91  # time scale of the push [s]; pace of the rebound against the push
    uneven_db, lag_s = 1.5, 0.00071  # the lag of one channel varies by half either way
    out, t = np.zeros((2, N)), np.arange(SR // 20) / SR
    for s, db in THUMPS:
        late, strength = rng.random((2, 2, 1))
        # one channel, picked at random, comes later
        lag = lag_s * rng.permutation([0, 1])[:, None] * (.5 + late)
        u = np.maximum(t - lag, 0) / length
        push = u * (rebound ** 2 * np.exp(-u * rebound) - np.exp(-u))
        add(out, s, amp(db + uneven_db * (2 * strength - 4.5)) * push / abs(push).max())
    return out


# colour of the spanner's first crack: (frequency [Hz], level [dB])
SPANNER_CRACK = [(150, -35), (400, -15.5), (1000, -9.5), (1900, -1.5), (3000, 7), (3800, -3), (4600, 8.5),
                 (5800, -14), (9000, -19), (15000, -20)]
# tones of the spanner: (frequency [Hz], level [dB], time to fall 60 dB [s])
SPANNER_MODES = [(1626, -15, .25), (1905, -1, .13), (2358, -9, .32), (3198, -12, .18), (3671, -16, .33),
                 (4587, 0, .32), (5087, -2, .26), (7690, -17, .14), (9060, -15, .12), (11200, -10, .1),
                 (13540, -12, .1)]
# the spanner coming off: (time [s], level [dB], tilt [dB per octave],
# time for the crack to fall 60 dB [s], favoured frequency [Hz], muted frequency [Hz],
# ring level [dB], favour [dB])
CLINKS = [(6.0, -29, -11, 0.2, 1605, 4750, -11, 16), (6.004, -41.5, 1, .06, 7480, 4750, -13, 30),
          (6.0505, -10.5, -2, 0.047, 4590, 4860, -7, 6), (6.223, -25.5, -6, 0.036, 5130, 4500, 2, 9.5),
          (6.268, -39, -9, 0.081, 5300, 4500, -11, 13)]


def spanner_clinks():
    """The spanner is pulled off: each contact cracks and the steel rings."""
    return hits(CLINKS, SPANNER_CRACK, hold=.005, modes=SPANNER_MODES, spread=.06, mute_octaves=.08)


# colour of the cloth: (frequency [Hz], level [dB])
SLEEVE_COLOUR = [(200, -20), (1200, 6), (4000, 1), (8000, -12), (15000, -13)]
# a sleeve brushing past: (time [s], level [dB])
SLEEVE = [(6.45, -77), (6.65, -48.5), (6.8, -52.5), (6.95, -64)]


def sleeve():
    """Cloth slides with a smooth hiss and catches in uneven, duller grains."""
    grain_db, catches_per_s = 6.0, 110
    slide_db, catch_db = -3, -5
    catches = amp(grain_db * (drift(catches_per_s) - 0.5)) * noise(SLEEVE_COLOUR, tilt=-6)
    slide = noise(SLEEVE_COLOUR, tilt=1)
    return swell(SLEEVE) * (amp(slide_db) * slide + amp(catch_db) * catches)


# how long the room rings: (frequency [Hz], time to fall 60 dB [s])
GARAGE = [(120, 0.89), (400, 0.61), (1000, .38), (2800, 0.28), (7000, 0.11), (14000, 0.12)]


def garage(x, build=0.0025):
    """Dense reflections build up quickly (build in s) and mostly die sooner in the treble."""
    hz, t, z = signal.stft(rng.standard_normal((2, SR)), SR, nperseg=256)
    decay = amp(-60 * t / read(GARAGE, hz)[:, None])
    tail = signal.istft(z * decay * (1 - np.exp(-t / build)), SR)[1]
    return signal.fftconvolve(x, tail / np.linalg.norm(tail[0]), axes=1)[:, :N]


# gain of the side signal for the work: (frequency [Hz], level [dB])
WIDTH = [(60, -23.5), (240, -23.5), (950, -24.5), (1890, -20), (3770, -11.5), (15000, 1)]
# gain of the side signal for the background: (frequency [Hz], level [dB])
AIR_WIDTH = [(60, -45.5), (130, -29.5), (290, -7), (640, -3.5), (15000, -2.5)]


def scene():
    """Mixes all sources as mid and side, adds the room's echo, then spreads them to left and right."""
    background = room_air() + shudder() + sleeve()
    arm, knocks, hub = suspension_arm(), dull_knocks(), hub_clacks()
    wrench, spanner = hammer(), spanner_clinks()
    sent = amp(-9.5) * (wrench + hub) + amp(-19) * spanner + amp(-12) * arm + amp(-11.0) * knocks
    work = wrench + spanner + hub + arm + knocks + garage(sent) + motor()
    mid, side = widen(work, WIDTH) + widen(background, AIR_WIDTH)
    balance = amp([[.15], [-.15]])  # left a touch louder
    return np.array([mid + side, mid - side]) * balance + thumps()


def record(dry, threshold_db=-7, squeeze=0.43, recovery_db_per_s=120):
    """A limiter turns loud moments down, remaining peaks clip at full scale, then the top treble is cut."""
    # short running average of the power, over about 80 samples
    power = signal.lfilter([1 / 80], [1, 1 / 80 - 1], (dry ** 2).mean(0))
    # the tracked level jumps up at once and sinks at the recovery rate
    fall = recovery_db_per_s * TIME
    level_db = np.maximum.accumulate(10 * np.log10(power + 1e-12) + fall) - fall
    over_db = np.maximum(level_db - threshold_db, 0)
    clipped = np.clip(dry * amp(-squeeze * over_db), -1, 1)
    edge_hz = 16000
    low_pass = signal.firwin(255, edge_hz, window=("kaiser", 8), fs=SR)
    return signal.oaconvolve(clipped, low_pass[None], "same")


dry = scene()
out = record(dry)
generate_wav(out)
```